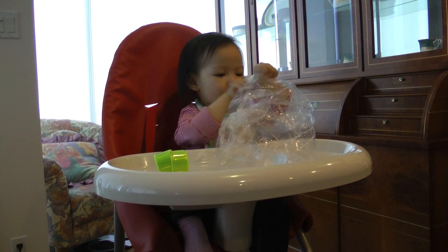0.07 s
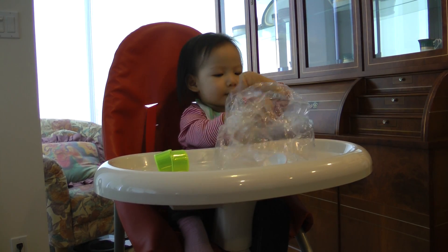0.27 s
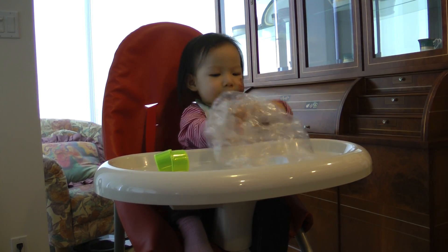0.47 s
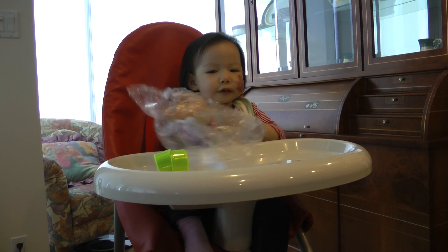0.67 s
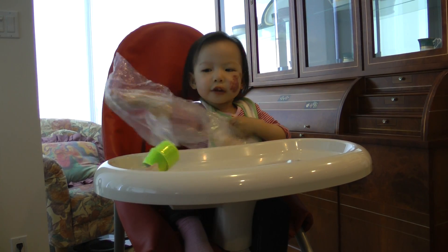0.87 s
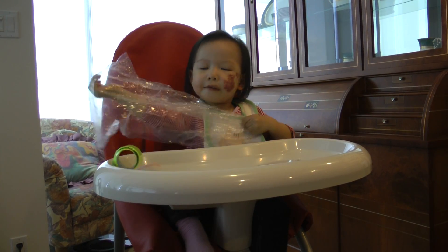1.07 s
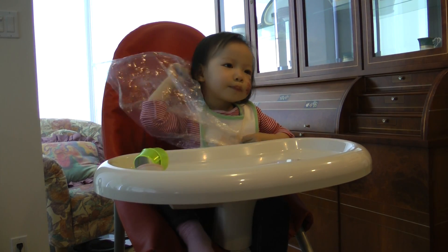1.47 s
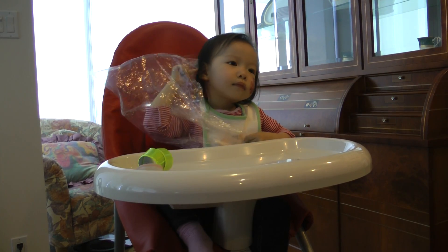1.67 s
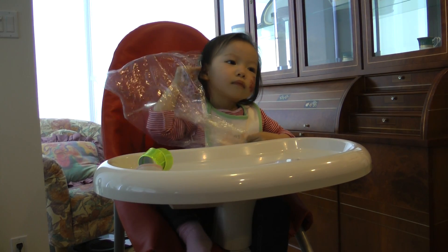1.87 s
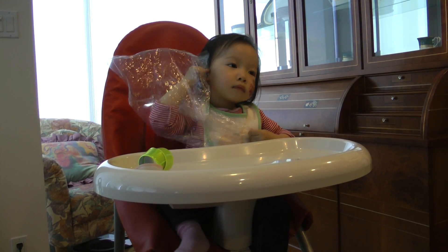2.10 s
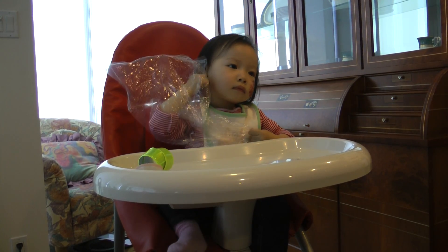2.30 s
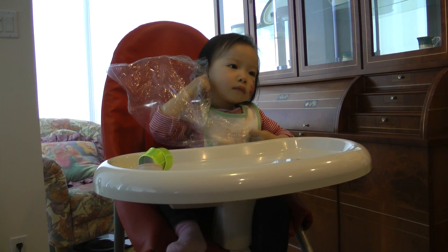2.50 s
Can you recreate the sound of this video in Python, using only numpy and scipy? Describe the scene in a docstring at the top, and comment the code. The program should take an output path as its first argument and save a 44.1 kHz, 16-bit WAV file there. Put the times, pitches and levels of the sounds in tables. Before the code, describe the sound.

Close up in a quiet furnished room, a thin plastic bag rustles and crackles as it is swept across a high chair tray. A small toy briefly rattles along, then the bag eases into light, separate crinkles.

```python
"""A thin plastic bag is swept across the tray of a high chair and lifted, close to one microphone.
Its creases buckle in a dense crackle, with single sharp snaps, dull crunches and one zipping slip.
On the way it pushes a small plastic toy, which rolls and rocks and sets the hollow tray ringing.
Behind them lie the short reverberation and faint hush of a quiet, furnished room."""
import sys
import numpy as np
from scipy import signal
from scipy.fft import rfft, irfft
from scipy.io import wavfile

SR = 44100
rng = np.random.default_rng(int(sys.argv[2]) if len(sys.argv) > 2 else 0)


def dump(signal):
    """Clip the signal to [-1, 1] and save it as 16-bit WAV at the path in sys.argv[1]."""
    limited = np.clip(np.atleast_2d(signal).T, -1, 1)
    pcm = np.round(limited * 32767).astype(np.int16)
    wavfile.write(sys.argv[1], SR, pcm)


N = 116865
TIME = np.arange(N) / SR

# How hard the bag is worked. Each row: time in seconds, relative level in dB.
BAG_EFFORT = [(0, -63.5), (.11, -61), (.145, -55.5), (.18, -63.5), (.24, -53.5), (.28, -56.5), (.33, -52.5),
              (.47, -50), (.55, -45), (.68, -42.5), (.85, -44), (1.05, -44), (1.12, -51), (1.18, -55),
              (1.26, -52.5), (1.38, -50.5), (1.51, -54), (1.565, -50), (1.63, -69.5), (1.71, -67.5),
              (1.745, -57.5), (1.78, -69.5), (1.9, -73.5), (2.03, -64), (2.09, -57.5), (2.14, -63),
              (2.24, -65.5), (2.29, -55), (2.34, -63), (2.38, -56), (2.41, -69), (2.5, -78.5), (2.65, -66)]
# The film's bright crackle and softer rustle. Each row: frequency in Hz, relative level in dB.
CRACKLE_SPECTRUM = [(300, -58), (950, -21), (2000, 1.5), (4000, -5), (6500, -4.5), (8400, -4), (10100, 5),
                    (12500, -1.5), (16000, -14)]
RUSTLE_SPECTRUM = [(200, -28.5), (600, 7), (930, -14), (1400, -2), (1600, -8), (1950, 2), (2400, -4.5),
                   (3000, 1), (5000, -2.5), (8400, -11), (10000, -1), (12500, -9.5), (16000, -11)]

def creases(spectrum, usual_per_s, spread_db, level_follows, patches=10):
    """Many small creases buckle in clumps, faster and louder the harder the bag is worked."""
    usual_db, rate_follows = -51, .7
    effort_db = curve(BAG_EFFORT) - usual_db
    per_s = usual_per_s / patches * from_db(rate_follows * effort_db)
    strength = from_db(usual_db + level_follows * effort_db) * clumps() / np.sqrt(patches)
    grains = sum(through(strength * random_clicks(per_s, spread_db), buckle()) for _ in range(patches))
    return through(grains, colour(spectrum))

def buckle(tail_db=-1, tail_s=.0015, size=512):
    """A crease gives way: a crack, then the film around it shivers for a few milliseconds."""
    shiver = from_db(tail_db) * unit(rng.standard_normal(size) * np.exp(-TIME[:size] / tail_s))
    shiver[0] = 1  # the crack
    return unit(shiver)

def clumps(depth_db=1.5, per_s=110):
    """One buckling crease sets off its neighbours: a quickly wavering gain with mean power one."""
    knots = rng.standard_normal(N // 40)
    waver = np.interp(TIME * per_s, np.arange(len(knots)), knots)
    return unit(from_db(depth_db * waver)) * np.sqrt(N)

# Single creases snapping through, near the microphone.
# Each row: start in seconds, relative level in dB, relative share of body in dB.
SNAP_EVENTS = [(0.0235, -43.5, -4), (0.0586, -40.5, -10), (0.1271, -41, -11), (0.1536, -35.5, -7),
               (0.2982, -27.5, -24), (0.306, -25, -35), (0.332, -24.5, -42), (0.351, -26, -25),
               (0.393, -25.5, -36), (0.7162, -31, -12), (0.8693, -15.5, -27), (0.971, -18.5, -32),
               (1.1184, -23.5, -7), (1.122, -26, -7.5), (1.1605, -45, 9.5), (1.4286, -31.5, -2.5),
               (1.5288, -37, -22), (1.5439, -26, -10.5), (1.5594, -33, -7), (1.5665, -34.5, -3),
               (1.681, -31, -17), (1.732, -36, -14), (1.7507, -40, -2.5), (1.799, -38.5, -28),
               (1.82, -38, -18), (1.935, -43, -25), (1.9875, -24.5, -41), (2.057, -40, -20),
               (2.0737, -24, -18), (2.092, -47, -12), (2.1023, -28.5, -17), (2.152, -31.5, -4),
               (2.1611, -32, -4.5), (2.2429, -32, -42), (2.2694, -31, -30), (2.324, -39, -3),
               (2.3357, -34, -9), (2.354, -38.5, -1.5), (2.371, -33.5, -6)]
# A snap's bright top and its lower body. Each row: frequency in Hz, relative level in dB.
SNAP_TOP_SPECTRUM = [(200, -58), (1000, -29), (3500, -23.5), (6300, -7), (8400, -13), (10200, -0.5),
                     (12500, -4.5), (16000, -9.5)]
SNAP_BODY_SPECTRUM = [(120, -39), (400, -36), (1100, -18), (1900, 1), (3500, 5), (6000, -3), (12000, -9)]

def snaps(gain_db=4.5, body_gain_db=5.5, lag_s=.0012, echo_s=.0066, echo_db=-12.5):
    """Large creases snap with a crack and a lower pop;
    a weaker second click follows a few milliseconds later, reflected off the tray."""
    out = np.zeros(N + SR)
    top, body = colour(SNAP_TOP_SPECTRUM), colour(SNAP_BODY_SPECTRUM)
    for s, db, body_db in SNAP_EVENTS:
        for delay, loss_db in ((0, 0), (echo_s * rng.uniform(.5, 1.5), echo_db)):
            crack = signal.fftconvolve(top, buckle(tail_db=-2, tail_s=.00091))
            pop = from_db(body_db + body_gain_db) * signal.fftconvolve(body, buckle())
            start = int((s + lag_s + delay) * SR)
            out[start:start + len(crack)] += from_db(db + gain_db + loss_db) * (crack + pop)
    return out[:N]

# Whole folds collapsing. Each row: start in seconds, relative level in dB, decay time in seconds.
FOLD_COLLAPSES = [(0.23, -61, 0.022), (0.563, -43, 0.013), (0.684, -37.5, 0.014), (0.756, -42, 0.014),
                  (0.846, -38, 0.017), (1.035, -45, 0.015), (1.427, -47, 0.011), (1.731, -58, .02),
                  (1.938, -62, 0.013), (2.276, -55.5, 0.016)]
# Their duller tone. Each row: frequency in Hz, relative level in dB.
CRUNCH_SPECTRUM = [(150, -59), (850, -22), (1200, 0), (1950, 7), (3200, 0.5), (5000, -7.5), (9000, -3),
                   (16000, -16)]

def crunches(attack_s=.009):
    """A fold gives way in a quick run of small cracks that dies down."""
    swell = np.zeros(N)
    for s, db, decay_s in FOLD_COLLAPSES:
        age = np.maximum(TIME - s, 0)
        swell += from_db(db) * np.minimum(age / attack_s, 1) * np.exp(-(age / decay_s) ** 2)
    return through(swell * random_clicks(per_s=3000, spread_db=-1), colour(CRUNCH_SPECTRUM))

# The zip as the bag starts to move. Each row: centre in seconds, level in dB, half-width in seconds.
SLIP_JERKS = [(0.0865, -43, .0006), (0.0899, -40, 0.0016), (.096, -47, 0.0013)]
# Its thin hiss. Each row: frequency in Hz, relative level in dB.
SLIP_SPECTRUM = [(2000, -34), (3500, -11.5), (5000, -9), (6200, 0.5), (7300, 2), (8000, -23), (9600, -2),
                 (12000, -22), (16000, -30)]

def slip():
    """Film slides over film in a few quick, hissing jerks."""
    jerks = sum(from_db(db) * np.exp(-.5 * ((TIME - s) / width) ** 2) for s, db, width in SLIP_JERKS)
    return through(jerks * rng.standard_normal(N), colour(SLIP_SPECTRUM))

# The toy rolling on the tray, beside the bag. Each row: time in seconds, level in dB.
TOY_ROLL = [(.54, -92), (.565, -43.5), (.61, -41), (.63, -47), (.7, -38.5), (.75, -46), (.82, -42.5),
            (.95, -42), (1.03, -50), (1.08, -57), (1.18, -64.5), (1.22, -52), (1.28, -69), (1.35, -54.5),
            (1.42, -61), (1.5, -49.5), (1.56, -60), (1.63, -74)]
# Its edges knocking on the tray. Each row: start in seconds, relative level in dB.
TOY_KNOCKS = [(.561, -35), (.572, -46), (.599, -42), (.689, -33), (.699, -39), (.73, -34), (.759, -27),
              (.784, -30.5), (.842, -43), (1.007, -44), (1.213, -41.5), (1.346, -43), (1.481, -41)]

def toy(bumps_per_s=1600, knock_gain_db=17.5, spots=6):
    """Small bumps and a few knocks of the rolling toy set the hollow tray ringing."""
    out = np.zeros(N)
    rolling = from_db(curve(TOY_ROLL)) / np.sqrt(spots)
    s, db = np.transpose(TOY_KNOCKS)
    for spot in range(spots):
        ring = tray_ring()
        bumps = rolling * random_clicks(bumps_per_s / spots, spread_db=1)
        knocks = clicks_at(s[spot::spots], db[spot::spots] + knock_gain_db)
        out += through(bumps + knocks, ring)
    return out

# Modes of tray and toy. Each row: frequency in Hz, relative level in dB, seconds to fall by 60 dB.
TRAY_MODES = [(380, -4.5, 0.13), (387.6, 2.5, 0.11), (434.3, -2.5, 0.13), (438.5, 3.5, 0.042),
              (506, -8, 0.037), (580.7, 1, 0.14), (690, -9.5, 0.043), (729.4, 3.5, 0.067), (788, 2, 0.057),
              (848, -23, .08), (1085, -10, 0.084), (1202, -7, 0.037), (1401, -3.5, 0.036),
              (1957, 13, 0.011)]
# The tray's dull thud. Each row: frequency in Hz, relative level in dB.
THUD_SPECTRUM = [(100, -32), (230, 2), (300, -5), (400, -14), (760, 5), (930, -12), (1900, -38),
                 (3200, -21), (8000, -32)]

def tray_ring(touch_s=.00079, thud_db=18, lowest_hz=260):
    """The tray answers a touch with a thud and a ring; each spot stirs the modes differently."""
    t = TIME[:SR // 2]
    ring = sum(from_db(db - 60 * t / t60) * np.sin(2 * np.pi * hz * t + rng.uniform(0, 2 * np.pi))
               for hz, db, t60 in TRAY_MODES)
    ring *= 1 - np.exp(-t / touch_s)
    thud = colour(THUD_SPECTRUM)
    ring[:len(thud)] += from_db(thud_db) * thud
    return unit(signal.sosfilt(signal.butter(2, lowest_hz, "high", fs=SR, output="sos"), ring))

# What the room around the chair sends back. Each row: frequency in Hz, relative level in dB.
REVERB_SPECTRUM = [(200, 3), (3000, 12), (7000, 10), (16000, 1)]

def room(x, t60_s=.38, gap_s=.005):
    """Diffuse reverberation of a furnished room reaches the microphone just after the direct sound."""
    tail = rng.standard_normal(N) * from_db(-60 * TIME / t60_s) * (TIME > gap_s)
    return through(x, unit(through(tail, colour(REVERB_SPECTRUM))))

# Room tone, far in the background. Each row: frequency in Hz, relative level in dB.
HUSH_SPECTRUM = [(60, -28), (110, -7), (140, -8), (175, 0.5), (225, -1), (285, 2), (410, 4), (560, -9.5),
                 (720, -12), (900, -25.5), (1400, -18), (1600, -25.5), (2100, -15), (8000, -33),
                 (10500, -23.5), (16000, -36)]

def hush(midway_db=-63, fade_db_per_s=1.5):
    """The still room's faint, low hush sinks slowly."""
    level = from_db(midway_db - fade_db_per_s * (TIME - TIME.mean()))
    return level * through(rng.standard_normal(N), colour(HUSH_SPECTRUM))

def from_db(db):
    """Decibels to gain."""
    return 10 ** (np.asarray(db) / 20)

def unit(x):
    """Scale to an energy of one."""
    return x / np.sqrt(np.sum(x ** 2) + 1e-20)

def curve(rows):
    """Join (seconds, value) rows by straight lines."""
    return np.interp(TIME, *np.transpose(rows))

def through(x, response):
    """Pass a sound through an impulse response."""
    return signal.fftconvolve(x, response)[:N]

def colour(points, size=4096):
    """Causal, minimum-phase response with the given spectrum; energy one."""
    hz, db = np.transpose(points)
    grid_hz = np.maximum(np.fft.rfftfreq(size, 1 / SR), 1)
    gain = from_db(np.interp(np.log(grid_hz), np.log(hz), db))
    cepstrum = irfft(np.log(gain))
    cepstrum[1:size // 2] *= 2
    cepstrum[size // 2 + 1:] = 0
    return unit(irfft(np.exp(rfft(cepstrum))))

def clicks_at(s, db):
    """One click at each time."""
    out = np.zeros(N)
    out[np.clip((s * SR).astype(int), 0, N - 1)] = from_db(db)
    return out

def random_clicks(per_s, spread_db):
    """Clicks of uneven size at random moments; mean power one."""
    chance = np.minimum(per_s / SR, 1)
    size = from_db(spread_db * np.minimum(rng.exponential(1, N), 3))
    clicks = (rng.random(N) < chance) * rng.choice([-1, 1], N)
    return clicks * unit(size) * np.sqrt(N / chance)

def scene():
    """Bag and toy up close, in mono; the bag's reverberation and the room's hush behind them."""
    crackle = creases(CRACKLE_SPECTRUM, usual_per_s=380, spread_db=5.5, level_follows=.99)
    rustle = creases(RUSTLE_SPECTRUM, usual_per_s=3000, spread_db=4.5, level_follows=1.005)
    bag = from_db(-4.5) * crackle + from_db(-1.5) * rustle + snaps() + crunches()
    zipping = slip()
    background = room(from_db(-14) * bag + from_db(-15) * zipping) + hush()
    return (bag + zipping + toy() + background)[None]

# The microphone's own noise. Each row: frequency in Hz, relative level in dB.
HISS_SPECTRUM = [(25, 7), (100, 13.5), (400, -13.5), (16000, -8)]

def record(dry):
    """The microphone cuts the bass, dips in the middle, adds a trace of hiss and cuts the top steeply."""
    low_cut_hz, top_cut_hz, hiss_db = 166, 16500, -89.5
    dip_hz, dip_q, dip_db = 922, 4.7, -4
    thin = signal.sosfilt(signal.butter(6, low_cut_hz, "high", fs=SR, output="sos"), dry)
    middle = signal.lfilter(*signal.iirpeak(dip_hz, dip_q, fs=SR), thin)
    hollow = thin - (1 - from_db(dip_db)) * middle
    hiss = from_db(hiss_db) * through(rng.standard_normal(N), colour(HISS_SPECTRUM))
    return signal.sosfilt(signal.ellip(10, .2, 70, top_cut_hz, fs=SR, output="sos"), hollow + hiss)

dry = scene()
out = record(dry)
dump(out)
```